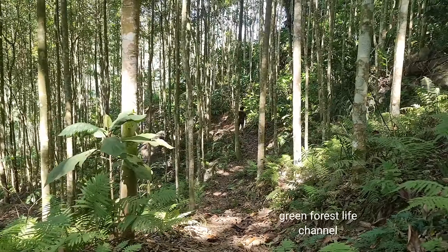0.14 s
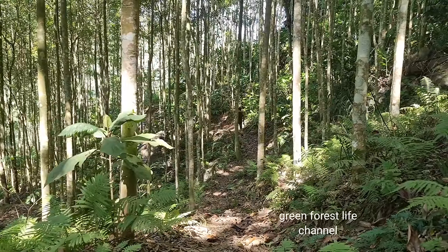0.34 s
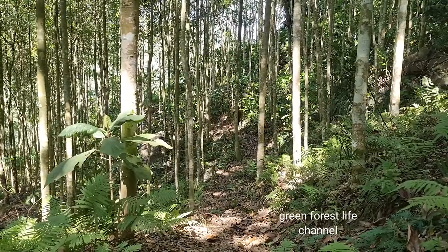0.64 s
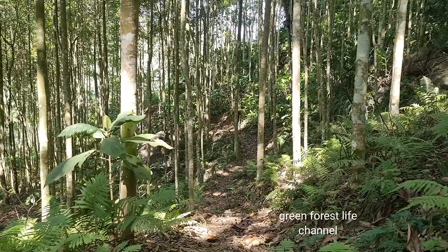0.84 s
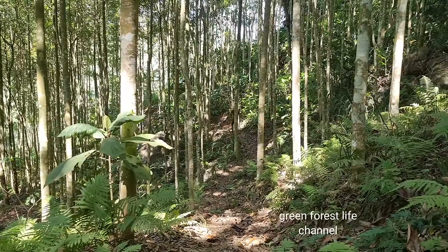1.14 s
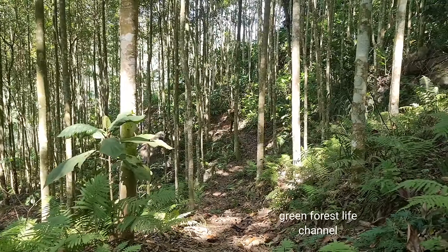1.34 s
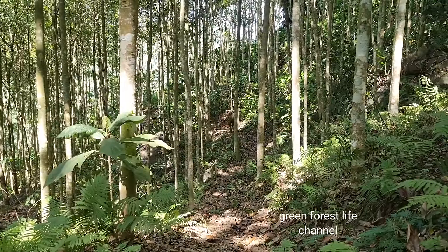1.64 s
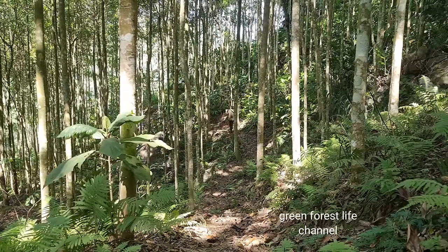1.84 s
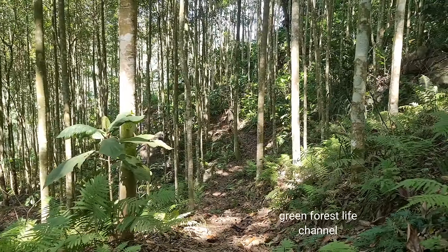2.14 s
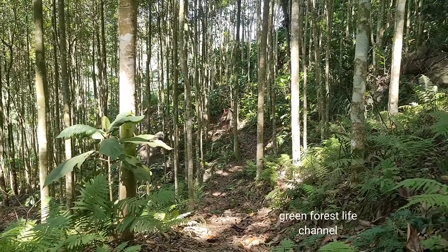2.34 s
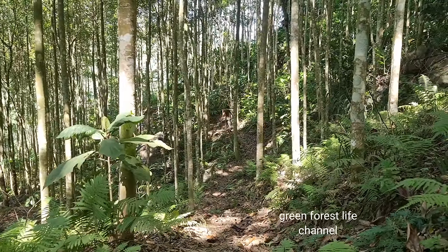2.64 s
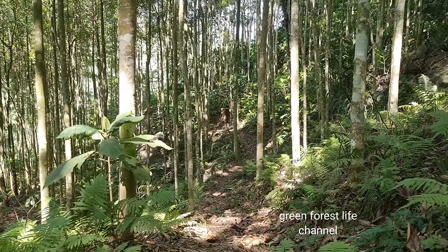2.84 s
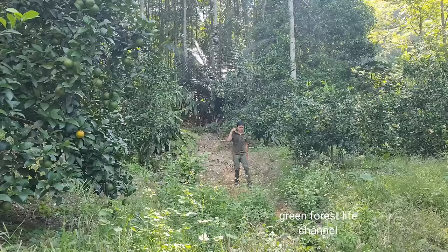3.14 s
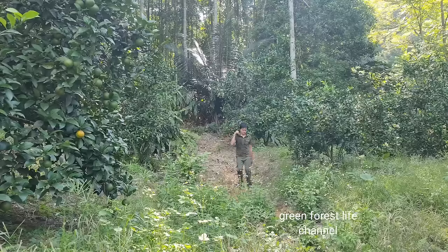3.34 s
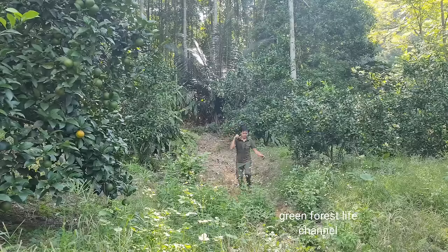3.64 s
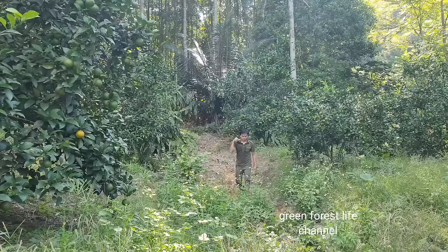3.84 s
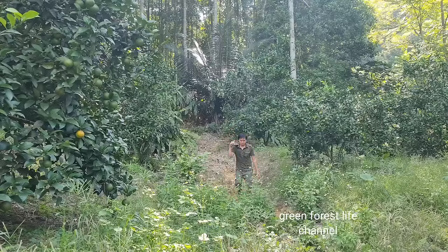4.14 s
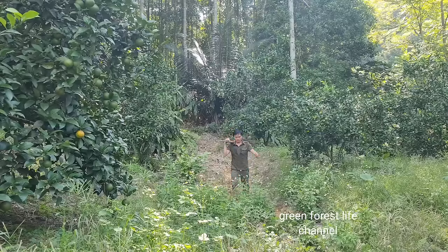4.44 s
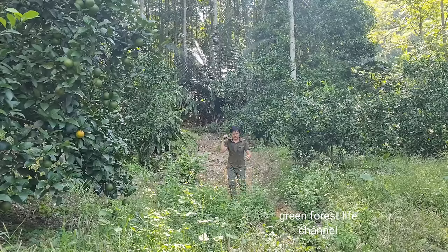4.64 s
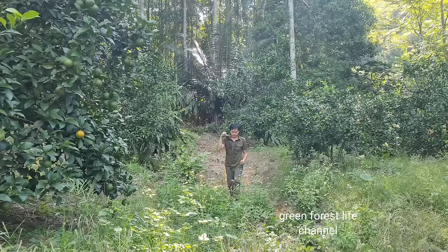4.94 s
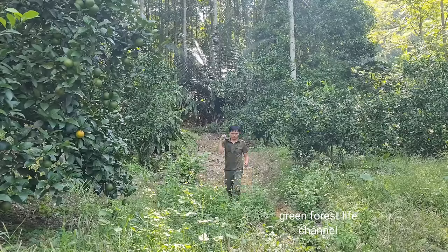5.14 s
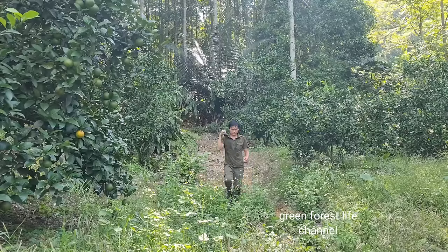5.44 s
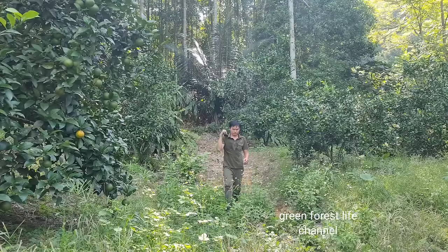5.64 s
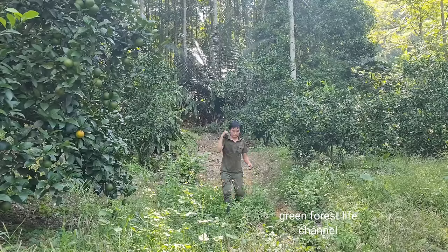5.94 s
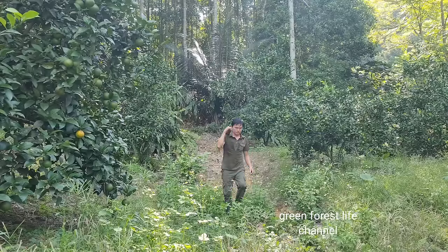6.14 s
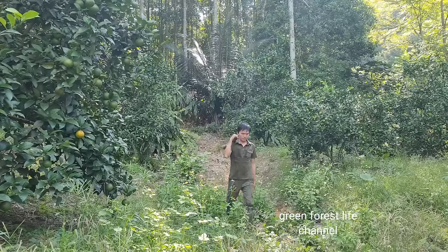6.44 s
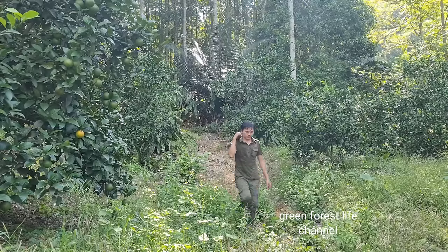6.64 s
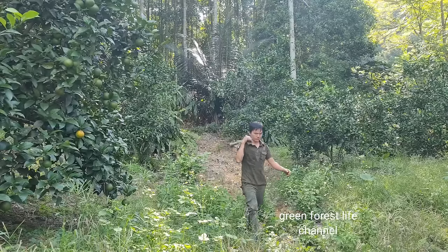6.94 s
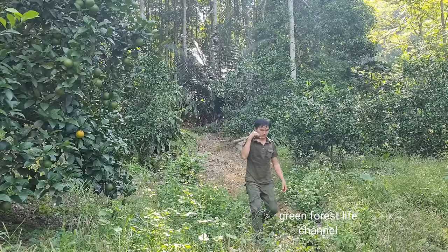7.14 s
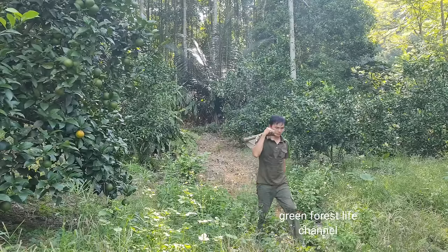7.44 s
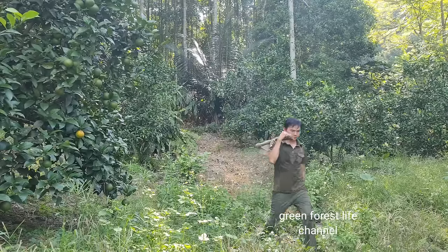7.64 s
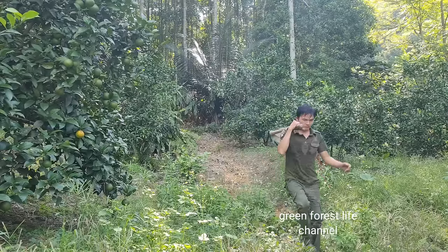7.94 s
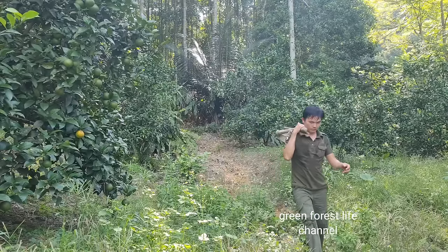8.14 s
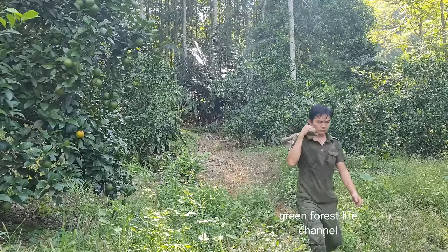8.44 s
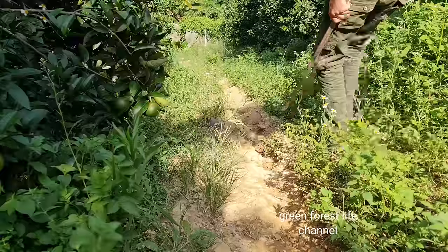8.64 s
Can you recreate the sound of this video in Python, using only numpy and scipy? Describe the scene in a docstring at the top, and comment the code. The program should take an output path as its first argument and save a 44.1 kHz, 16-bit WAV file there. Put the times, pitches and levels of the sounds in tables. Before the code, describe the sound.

Outdoors among trees, pulsing cicadas and high katydid chirps lie over gentle leafy air and light rustling. After about three seconds the insects turn thinner and higher, and a walker's metal tools knock together with short, uneven rings. Dry footsteps follow, with crackling leaves, sharp twig snaps and dull thuds growing denser near the microphone, ending in a loud sweep through foliage. Faint low breeze moves underneath.

```python
"""Cicadas sing throughout, a katydid at first, and a bee passes while someone walks through weeds near
the microphone, steel tools clinking on the shoulder, boots thudding and snapping stems.
Weeds and cicadas are filtered random clicks, the katydid is gated noise, the bee is a sum of harmonics,
steel is decaying sine modes with chatter, and snaps and thuds are short gritty rings.
The scene crossfades once, from among the trunks to a clearing."""
import sys
import numpy as np
from scipy import signal
from scipy.fft import rfft, irfft, next_fast_len
from scipy.io import wavfile
from scipy.ndimage import uniform_filter1d, map_coordinates

SR = 44100
rng = np.random.default_rng(int(sys.argv[2]) if len(sys.argv) > 2 else 0)


def file_out(sig):
    """Save sig as 16-bit WAV at sys.argv[1]."""
    # one column per channel
    cols = np.atleast_2d(sig).T
    # limit, then scale
    lim = np.clip(cols, -1, 1)
    pcm = np.round(lim * 32767).astype(np.int16)
    wavfile.write(sys.argv[1], SR, pcm)


N = 387638


def gain_of(db):
    """Amplitude factor of a level in dB."""
    return np.exp(np.asarray(db) * (np.log(10) / 20))


def evened(x):
    """Scales to an rms of one."""
    return x / np.sqrt(np.mean(x ** 2) + 1e-20)


def read(points, hz):
    """Reads a (hz, value) curve, straight over log frequency."""
    f, value = np.transpose(points)
    return np.interp(np.log(hz + 1), np.log(f + 1), value)


def curves(rows):
    """Joins timed rows by straight lines, one curve a column."""
    s, *columns = np.transpose(rows)
    return [np.interp(np.arange(N) / SR, s, c) for c in columns]


def add(mix, s, sound):
    """Adds a sound to the mix at s seconds."""
    part = mix[round(s * SR):][:len(sound)]
    part += sound[:len(part)]


def colour(x, points):
    """Filters by a (hz, dB) curve and evens the result."""
    size = next_fast_len(N)
    gain = gain_of(read(points, np.fft.rfftfreq(size, 1 / SR)))
    return evened(irfft(rfft(x, size) * gain, size)[..., :N])


def wander(length, size):
    """Slow random drift with an rms of one, smoothed over size samples."""
    return evened(uniform_filter1d(rng.standard_normal(length), size=size))


def grains(count, spread_db):
    """Two unrelated trains of count random clicks; a few are large."""
    place, sign, size = rng.random((count, 2, 3)).T
    train = np.zeros((2, N))
    size_db = spread_db * np.minimum(-np.log(size + 1e-9), 5)
    np.put_along_axis(train, (place * N).astype(int), np.sign(sign - .5) * gain_of(size_db), 1)
    return evened(train)


def spread(pair, same):
    """The right port hears a share of what the left hears."""
    same = np.clip(same, 0, 1)
    return np.array([pair[0], same * pair[0] + np.sqrt(1 - same ** 2) * pair[1]])


def bursts(rows):
    """Loudness of separate swells (top s, dB, rise s, fall s), added as powers."""
    t = np.arange(0, N + 64, 64) / SR
    power = 0
    for s, db, rise, fall in rows:
        drop = np.maximum((s - t) / abs(rise), (t - s) / abs(fall))  # in steps of 20 dB
        power = power + gain_of(db - 20 * drop) ** 2
    return np.interp(np.arange(N) / SR, t, np.sqrt(power))


# crossfade from among the trunks to the clearing: start_s, end_s
CROSSFADE_S = (3.3, 3.4)


def clearing_share(seconds):
    """Share of the crossfade made: 0 among the trunks, 1 in the clearing."""
    return np.interp(seconds, CROSSFADE_S, [0, 1])


# legs and boots through weeds: top_s, stalks_db, fizz_db, rise_s, fall_s
# (levels before panning; each time is for 20 dB, its sign ignored)
BRUSH = [(.24, -54, -55.5, 0.065, 0.6), (.54, -51.5, -64, 0.047, 0.26), (.94, -65, -62, .08, 0.3),
         (1.46, -58, -62, 0.025, 0.68), (1.98, -45, -51, .12, 0.07), (2.059, -44, -46, 0.15, 0.17),
         (2.22, -61.5, -54.5, 0.041, 1), (2.53, -55, -52, 0.014, 0.3), (2.71, -52.5, -52, 0.089, 0.18),
         (2.84, -57, -56, .06, 0.25), (3.25, -55.5, -60, 0.31, 0.32), (3.33, -57.5, -74, 0.14, 0.34),
         (3.71, -52, -69, 0.15, 0.15), (4.06, -57, -87, 0.03, 0.27), (4.41, -39, -51, .03, 0),
         (4.52, -53.5, -70, 0.45, .5), (4.75, -60, -80, 0.017, 0.2), (4.87, -59.5, -68, .06, 0.2),
         (5.01, -61, -61, 0.22, 0.15), (5.12, -47.5, -52.5, 0.0071, 0.04), (5.22, -52.5, -64, 0.12, 0.15),
         (5.4, -48.5, -55, 0.13, .05), (5.47, -56, -57.5, 0.059, 0.4), (5.75, -53.5, -52, 0.067, 0.45),
         (5.99, -51.5, -57, 0.11, 0.44), (6.09, -53, -66, 0.023, 0.3), (6.17, -53.5, -51, 0.036, 0.5),
         (6.36, -51, -45.5, 0.32, 0.1), (6.511, -41, -38.5, 0.15, .14), (6.58, -52, -40.5, .02, 0.02),
         (6.781, -44, -40, 0.047, 0.22), (6.84, -42.5, -38.5, 0.13, 0.12), (6.91, -67, -43, 0.055, .05),
         (7.058, -44.5, -41, 0.054, 0.19), (7.19, -49.5, -54, 0.071, 0.09),
         (7.24, -50.5, -46.5, 0.038, .05), (7.31, -55, -77, 0.079, 0.36), (7.499, -52, -42.5, 0.049, 0.12),
         (7.66, -47, -49.5, 0.029, 0.15), (7.829, -50, -54.5, .3, 0.1), (7.95, -56, -56.5, .08, .5),
         (8.05, -50, -60, 0.12, .04), (8.168, -45.5, -44, 0.085, 0.16), (8.41, -45, -50, 0.06, .15),
         (8.6, -45, -48, 0.023, 0.2), (8.651, -35, -33.5, 0.079, 0.08), (8.73, -49, -44, 0.059, -3.5)]
# colour of stalks, then of leaf fizz: pitch_hz, relative_db per Hz
LEAF_BODY = [(88, -67), (150, -13), (264, -4.5), (365, -25), (485, -7), (903, -14), (1810, 0),
             (2080, -10.5), (2260, -2), (4400, -8), (5720, -18), (9680, -120)]
LEAF_FIZZ = [(2500, -20), (4000, -18.5), (6000, -3.5), (9000, -9), (12000, -12), (15000, -18), (16000, -29)]
# further colour of stalks, from among the trunks and close by: pitch_hz, relative_db
FAR_STALKS = [(300, -1), (900, -2), (1400, 5), (1900, 0.5), (2300, -0.5), (3500, -3)]
NEAR_STALKS = [(300, -0.5), (750, 3.5), (1500, 0.5), (2500, -0.5), (3500, 1)]


def brush():
    """Leaves crackle in clumps; each leaf favours its own patch of pitches for a moment."""
    stalks = bursts([(s, db, rise, fall) for s, db, _, rise, fall in BRUSH])
    fizz = bursts([(s, db, rise, fall) for s, _, db, rise, fall in BRUSH])
    clumps = gain_of(0.86 * wander(N, 300))
    clicks = grains(count=45000, spread_db=2.0) * clumps + .5 * grains(count=4000, spread_db=1.8)
    z = signal.stft(spread(clicks, 0.37), nperseg=256)[2]
    leaves = rng.standard_normal(z.shape[1:])  # pitch by time
    leaves = evened(uniform_filter1d(uniform_filter1d(leaves, size=4, axis=0), size=4, axis=1))
    crackle = signal.istft(z * gain_of(3.3 * leaves), nperseg=256)[1][:, :N]
    body, near = colour(crackle, LEAF_BODY), clearing_share(np.arange(N) / SR)
    body = (1 - near) * colour(body, FAR_STALKS) + near * colour(body, NEAR_STALKS)
    return stalks * gain_of([[-1.8], [1.8]]) * body + fizz * colour(crackle, LEAF_FIZZ)


# steel on steel: start_s, level_db (before the mix of ring and crack), place (blade edge 0 to socket 1),
# crack (share), rattle_s (decay constant), damping (divides the ring times)
CLINKS = [(3.421, -24, .1, 0.8, 0.022, 1.11), (3.668, -40, 0.63, 0.76, .01, 1.8),
          (4.049, -40.5, 1, 1.1, 0.0082, 3.5), (4.236, -22, 0.7, 0.75, 0.012, 1.2),
          (4.387, -27.5, .4, 0.72, 0.017, 5.3), (4.407, -33, 0.42, 0.67, 0.0028, 6.7),
          (4.465, -23, 0.6, 0.9, 0.0051, 3), (4.502, -34, 0.16, .3, 0.011, 1.1),
          (4.600, -37, 1, 1.35, 0.0035, 2.5), (4.868, -43.5, 0.18, 0.78, 0.0054, 5.7),
          (5.977, -32, 0.93, 0.9, 0.013, 1.9), (6.086, -32.5, 1, 0.86, 0.0052, 3.8),
          (6.158, -40, 0.078, 0.65, 0.015, 2.6), (6.22, -40.5, 0.48, 0.7, .015, 0.82)]
# modes of the steel: pitch_hz
STEEL_HZ = [861, 996, 1254, 1427, 1550, 1730, 1820, 1981, 2284, 2495, 2546, 2916, 2988, 3074, 3366, 3602,
            3707, 4011, 4242, 4403, 4737, 5105, 5397, 5889, 5972, 6650]
# the same modes: t60_s before damping, edge_db, socket_db (struck at either end)
STEEL = [(0.011, -21, -6), (0.15, -14.5, -17), (0.33, -17, -9.5), (0.22, -10, -18.5), (0.39, -12, -49),
         (0.29, -12, -3), (0.48, -15, -41), (0.79, -16, -50), (0.37, -12.5, -3), (0.46, -5, -21),
         (0.27, -21, -8), (0.14, -2, -4), (.15, -21, -19), (0.43, -10.5, -20), (0.26, 1, -46),
         (0.54, -16, -13), (0.74, -4.5, -43), (0.36, -30, -25), (0.42, -23, -30), (0.2, -7.5, -11.5),
         (0.39, -9, -42), (0.42, -13.5, -18.5), (0.17, -22, -39), (0.15, -16, -33), (0.28, -19, -18),
         (0.24, -13.5, -24)]


def clink(db, place, crack, rattle, damping):
    """A tap rings the steel, the place choosing the modes; the contact chatters as a short noise."""
    t, (t60, edge_db, socket_db) = np.arange(SR // 4) / SR, np.transpose(STEEL)
    knots = np.linspace(0, t[-1], 33)[:, None]
    # the tools keep touching loosely, so every mode wavers on its own
    waver_db = 2.8 * rng.standard_normal((len(knots), len(STEEL)))
    struck_db = edge_db + place * (socket_db - edge_db)
    level = gain_of(struck_db - 60 * knots * damping / t60 + waver_db)
    phase = rng.uniform(0, 2 * np.pi, len(STEEL))
    ring = sum(np.interp(t, knots[:, 0], g) * np.sin(2 * np.pi * hz * t + p)
               for g, hz, p in zip(level.T, STEEL_HZ, phase))
    band = signal.butter(3, [800, 4000], "bandpass", fs=SR)
    chatter = evened(signal.lfilter(*band, rng.standard_normal(len(t))))
    chatter = chatter * np.exp(-t / max(rattle, 1e-4))
    shape = (1 - np.exp(-t / 0.0016)) * np.minimum((t[-1] - t) / .05, 1)
    return gain_of(db) * (0.52 * ring + 0.56 * crack * chatter) * shape


# extra short rings of single steel modes, some along with a clink: start_s,
# level_db (of each mode, before its rise and decay), modes (indices into STEEL_HZ),
# rise_s (time constant), t60_s, length_s
EXTRA_RINGS = [(3.19, -50, [9], .05, 2, .235), (3.675, -54, [8, 9], .01, .5, .11), (4.07, -51, [5],
               .008, .22, .075), (4.515, -47, [19], .01, .4, .07), (5.978, -42, [9], .004, .8, .116),
               (5.978, -44, [2, 16], .003, .2, .07), (6.097, -43, [5], .003, .12, .04)]


def extra_ring(db, modes, rise, t60, length):
    """One or two modes swell, ring unevenly and are stopped."""
    t = np.arange(round(length * SR)) / SR
    knots = np.arange(0, length + .012, .012)
    ring = 0
    for k in modes:
        uneven_db = np.interp(t, knots, 1.5 * rng.standard_normal(len(knots)))
        ring = ring + gain_of(uneven_db) * np.sin(2 * np.pi * STEEL_HZ[k] * t)
    stop = np.minimum((length - t) / 0.0044, 1)
    return gain_of(db - 60 * t / t60) * (1 - np.exp(-t / rise)) * stop * ring


# stems and clods cracking underfoot: start_s, peak_db (before panning), pitch_hz
SNAPS = [(0.529, -37, 1840), (1.93, -34, 1740), (2.214, -42, 1660), (2.532, -44, 1610), (2.569, -37, 3560),
         (3.346, -32.5, 2490), (3.654, -36, 1340), (4.534, -33, 1060), (4.551, -26.5, 1430),
         (4.67, -45, 2270), (4.749, -45, 1330), (4.772, -41.5, 1350), (5.118, -32, 1820),
         (5.219, -31, 1310), (5.467, -39.5, 3220), (5.5, -37, 1510), (5.905, -37, 2230), (5.939, -39, 3520),
         (6.092, -27, 2270), (6.31, -38.5, 1120), (6.424, -39, 4090), (6.506, -29, 1800),
         (6.547, -26, 1930), (6.574, -36, 1060), (6.584, -42, 2330), (6.603, -34, 468), (6.717, -40.5, 734),
         (6.749, -34.5, 3040), (6.803, -30, 1400), (6.959, -33.5, 1810), (6.99, -37.5, 1050),
         (7.043, -30, 3580), (7.053, -26.5, 3550), (7.071, -31, 1990), (7.078, -23.5, 3300),
         (7.14, -28.5, 4070), (7.235, -41.5, 750), (7.53, -46, 2300), (7.648, -29, 2480),
         (7.657, -22, 1400), (7.67, -25.5, 1870), (7.746, -38, 1810), (7.778, -28.5, 2980),
         (7.782, -34, 454), (7.948, -36, 1870), (8.168, -31, 2380), (8.396, -47, 2930), (8.587, -36, 1910),
         (8.732, -29, 1840)]
# footfalls felt through the soil: time_s, peak_db (before panning), pitch_hz
THUDS = [(0.176, -49, 143), (0.516, -43, 307), (0.936, -56, 86), (1.956, -50, 237), (2.812, -50.5, 290),
         (3.343, -41.5, 330), (3.646, -43.5, 88.4), (4.054, -35, 73), (4.394, -46.5, 269),
         (5.206, -39.5, 197), (5.546, -50.5, 220), (6.217, -49, 254), (6.3, -47, 164), (6.589, -51.5, 216),
         (6.754, -38, 219), (6.979, -37.5, 173), (7.648, -29, 248), (8.427, -39.5, 145), (8.635, -34, 131)]
# something hollow pops underfoot: start_s, peak_db (before panning), pitch_hz, t60_s
POP = (7.174, -45, 1150, .13)
SNAP_T60_S, THUD_T60_S = 0.021, 0.12


def knock(db, hz, t60, grit, width):
    """A strongly damped ring, roughened by grit around its pitch."""
    t = np.arange(round(1.2 * min(t60, .15) * SR) + 64) / SR
    band = signal.butter(2, [hz / width, min(hz * width, 7000)], "bandpass", fs=SR)
    noise = evened(signal.lfilter(*band, rng.standard_normal(8192)))[:len(t)]
    ring = np.sin(2 * np.pi * hz * t) + grit * noise
    sound = ring * gain_of(-60 * t / t60) * (1 - np.exp(-t * hz * 4))
    return gain_of(db) * sound / abs(sound).max()


def trees(x, t60):
    """Trunks and bushes scatter sparse echoes, other ones to each side."""
    taps = np.zeros((2, SR // 2))
    # one echo at a random place in every 20 samples
    at = np.arange(200, SR // 2 - 20, 20) + rng.integers(0, 20, (2, (SR // 2 - 201) // 20))
    np.put_along_axis(taps, at, rng.choice([-1., 1.], at.shape), 1)
    taps *= gain_of(-60 * np.arange(SR // 2) / SR / t60)
    return signal.fftconvolve(x[None], taps / np.linalg.norm(taps[0]), axes=1)[:, :N]


# cicada choruses: start_s, low_db, high_db (before throb and panning)
CHORUS = [(0.0, -44, -57), (0.24, -40, -57.5), (0.71, -44, -58), (1.1, -41, -57), (1.52, -43, -59),
          (1.79, -42.5, -51), (2.3, -43, -56.5), (3.28, -42, -56), (3.47, -62.5, -54.5), (4.5, -56.5, -54),
          (6.5, -58.5, -54), (7.2, -57, -53), (8.79, -58, -54.5)]
# a duller cicada that swells now and then: top_s, level_db (before throb and panning), rise_s, fall_s
# (each time is for 20 dB, its sign ignored)
SWELLS = [(0.0, -48, .1, 0.36), (.24, -48.5, 0.034, 0.34), (.99, -57.5, .1, 1), (1.18, -47, .08, .25),
          (1.79, -57, 0.11, 1), (2.05, -53, 0.21, -2.3), (2.37, -48, 0.31, .16), (2.6, -46.5, 0.14, -0.28),
          (2.75, -48.5, 0.27, .1), (3.0, -59, 0.84, -3.7), (3.27, -64, .18, -0.5)]
# resonances of the three tymbals: pitch_hz, width_hz (at half amplitude), relative_db
LOW_TYMBAL = [(5093, 630, 3.5), (4720, 640, -5.5), (5520, 1180, -12)]
HIGH_TYMBAL = [(7663, 1060, 8), (6570, 690, -1.5), (8480, 690, -7)]
DULL_TYMBAL = [(3400, 1020, -0.5), (4360, 720, 4)]


def chorus(level, tymbal, throb_hz, throb_db, pan_db):
    """Many tymbals click out of step; the nearest singers make the whole throb a little."""
    clicks, size = spread(grains(count=50000, spread_db=1.5), 0.014), next_fast_len(N)
    hz = np.fft.rfftfreq(size, 1 / SR)
    ring = sum(gain_of(g) / (1 + (2 * (hz - f) / w) ** 4) for f, w, g in tymbal)
    song = evened(irfft(rfft(clicks, size) * ring, size)[:, :N])
    wobble = np.cumsum(1 + 0.04 * wander(N, 8000))  # the throb rate drifts
    throb = throb_db * np.sin(2 * np.pi * throb_hz * wobble / SR)
    return level * gain_of(throb + np.array([[pan_db], [-pan_db]])) * song


# katydid chirps: top_s, level_db, pitch_hz (wing resonance)
KATYDID = [(0.0, -57.5, 13600), (0.27, -55.5, 13800), (0.58, -67, 13600), (0.76, -64, 14500),
           (1.03, -59, 13600), (1.24, -64, 14500), (1.6, -60, 14600), (1.84, -58, 12800),
           (2.06, -52.5, 13350), (2.29, -54, 13700), (2.5, -50.5, 13900), (2.7, -49.5, 14200),
           (2.95, -49.5, 14200), (3.24, -50, 14300)]
CHIRP_RISE_S, CHIRP_FALL_S = 0.13, 0.18  # time to change by 20 dB


def resonate(x, hz, width):
    """Shifts the curve hz down to zero, smooths twice, and shifts back."""
    turn, r = np.exp(2j * np.pi * np.cumsum(hz) / SR), np.exp(-np.pi * width / SR)
    smooth = signal.lfilter([(1 - r) ** 2], [1, -2 * r, r * r], x / turn + 1e-18)
    return 2 * (turn * smooth).real


def katydid():
    """Wing strokes gate a hiss of teeth that rings the wing; silent from the end of the crossfade."""
    end = round(CROSSFADE_S[1] * SR)
    hz = curves(KATYDID)[1][:end]
    fade = np.minimum(np.arange(end)[::-1] / SR / 0.12, 1) ** 2
    level = bursts([(s, db, CHIRP_RISE_S, CHIRP_FALL_S) for s, db, _ in KATYDID])[:end] * fade
    strokes = np.cumsum(180 * (1 + 0.08 * wander(SR * 4, 2000)[:end])) / SR  # about 180 a second
    teeth = spread(rng.standard_normal((2, end)), .2) * (0.4 + np.exp(-(strokes % 1) / 0.36))
    return np.pad(level * evened(resonate(teeth, hz, 1300)), ((0, 0), (0, N - end)))


# bee flying off: start_s, beat_hz (before waver; it sags), beat_db, overtones_db (left side levels)
BEE = [(1.75, 267, -58, -77), (1.85, 253, -61.5, -66), (2.0, 250, -61, -61), (2.1, 244.3, -67, -60.5),
       (2.25, 235.3, -73, -68)]
# its overtones: multiple of the beat, relative_db
BEE_ORDERS = [(2, 0.5), (3, -26), (4, -11.5), (5, -6), (6, -15), (7, -25)]
BEE_WAVER = .008  # share of the beat rate


def bee():
    """An unsteady wing beat with a few overtones, stronger on the right."""
    start, end = round(BEE[0][0] * SR), round(BEE[-1][0] * SR)
    hz, beat_db, over_db = (c[start:end] for c in curves(BEE))
    waver = 1 + BEE_WAVER * wander(SR, 600)[:len(hz)]
    turn = 2 * np.pi * np.cumsum(hz * waver) / SR
    overtones = sum(gain_of(g) * np.cos(k * turn) for k, g in BEE_ORDERS)
    buzz = gain_of(beat_db) * np.cos(turn) + gain_of(over_db) * overtones
    return gain_of([[0.], [4.5]]) * np.pad(buzz * signal.windows.tukey(len(hz), .15), (start, N - end))


# air among the trunks, then in the clearing: pitch_hz, relative_db per Hz
GROVE = [(53, -44), (90, -23.5), (228, -17), (873, -22), (1320, -20.5), (3890, -22), (5040, -1),
         (6260, -39), (7940, -16), (11200, -29), (14300, -34), (15900, -63)]
CLEARING = [(53, -37), (90, -8.5), (893, -10.5), (1780, -16.5), (4150, -19.5), (4930, -3), (6000, -13),
            (7610, 3.5), (8660, -28), (9450, -35), (14600, -28), (15900, -40)]
# relative_db of the air: among the trunks, in the clearing
AIR_DB = (-52.5, -55.5)
# likeness of left and right: pitch_hz, likeness
SAME = [(100, 1), (300, 0.067), (1000, 0.043), (4000, 0.034)]


def air():
    """Distant leaves: random short-time spectra with drifting patches."""
    frames, hz = N // 256 + 5, np.fft.rfftfreq(1024, 1 / SR)
    a, b, c, d, patches = rng.standard_normal((5, 513, frames))  # pitch by time
    patches = evened(uniform_filter1d(uniform_filter1d(patches, 12, 0), 14, 1))
    same, left = np.clip(read(SAME, hz), -1, 1)[:, None], a + 1j * b
    z = np.array([left, same * left + np.sqrt(1 - same ** 2) * (c + 1j * d)])
    grove, clearing = (gain_of(db) * evened(gain_of(read(p, hz)))[:, None]
                       for p, db in zip((GROVE, CLEARING), AIR_DB))
    share = clearing_share(np.arange(frames) * 256 / SR)
    z *= (1 - share) * grove + share * clearing
    z *= gain_of(2.4 * patches - 25 + np.array([-1.2, 1.2])[:, None, None])
    return signal.istft(z, nperseg=1024, noverlap=768)[1][:, :N]


# moving air at the microphone: start_s, level_db (before lumps and panning)
BREEZE = [(0.0, -62.5), (1.0, -67), (2.9, -70.5), (3.3, -69), (5.5, -69.5), (7.0, -64.5), (7.9, -60),
          (8.15, -67), (8.6, -56.5), (8.79, -65)]


def breeze():
    """A low, lumpy rumble of moving air."""
    gusts = spread(rng.standard_normal((2, N)), 0.51)
    # pitch_hz, relative_db
    rumble = colour(gusts, [(20, -47), (35, -7.5), (52, -3.5), (80, -5.5), (140, -13.5), (260, -12.5), (500, -70)])
    lumps_db = 1.0 * wander(N, 6000)
    return gain_of(curves(BREEZE)[0] + lumps_db + np.array([[-1.4], [1.4]])) * rumble


# direct sounds of the walker: start_s, lag_s (left is late by this)
LAG = [(0, -.0006), (3.2, -.0006), (3.4, 2e-5), (6.5, 3e-5), (8.79, 13e-5)]


def scene():
    """The walker, lagged between the sides and echoed by trees, over insects, air and breeze."""
    near, underfoot, ground = np.zeros((3, N))
    for s, *row in CLINKS:
        add(near, s, clink(*row))
    for s, *row in EXTRA_RINGS:
        add(near, s, extra_ring(*row))
    for s, *row in SNAPS:
        add(underfoot, s, knock(*row, t60=SNAP_T60_S, grit=0.72, width=2.13))
    for s, *row in THUDS:
        # every thud starts 4 ms after its listed time
        add(ground, s + 0.00401, knock(*row, t60=THUD_T60_S, grit=0.73, width=3.36))
    add(underfoot, POP[0], knock(*POP[1:], grit=0.11, width=1.1))
    left, right = (near + underfoot + ground) * gain_of([[-1.5], [1.5]]) + brush()
    left = map_coordinates(left, [np.arange(N) - curves(LAG)[0] * SR], order=1)
    echoes = gain_of(-1.5) * trees(near + 0.73 * underfoot, t60=0.078)
    low, high = gain_of(curves(CHORUS))
    insects = chorus(low, LOW_TYMBAL, throb_hz=31.5, throb_db=0.82, pan_db=-1.0)
    insects += chorus(high, HIGH_TYMBAL, throb_hz=68.0, throb_db=0.35, pan_db=1.0)
    insects += chorus(bursts(SWELLS), DULL_TYMBAL, throb_hz=38.0, throb_db=0.53, pan_db=-0.85)
    return np.array([left, right]) + echoes + insects + katydid() + bee() + air() + breeze()


EDGE_HZ = 15900


def record(dry):
    """The band limit of the recorder: a steep low-pass at EDGE_HZ."""
    return signal.oaconvolve(dry, signal.firwin(511, EDGE_HZ, window=("kaiser", 9), fs=SR)[None], "same")


dry = scene()
out = record(dry)
file_out(out)
```